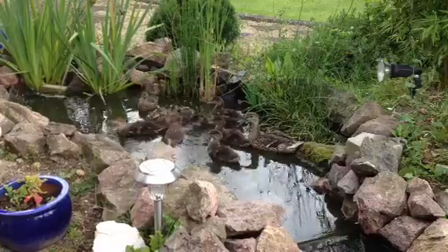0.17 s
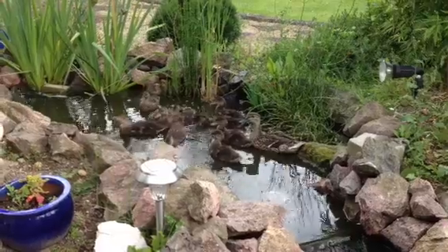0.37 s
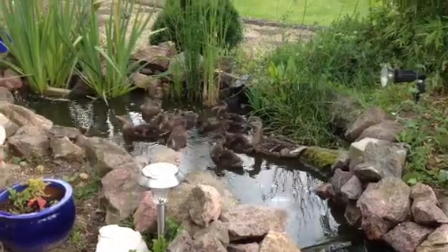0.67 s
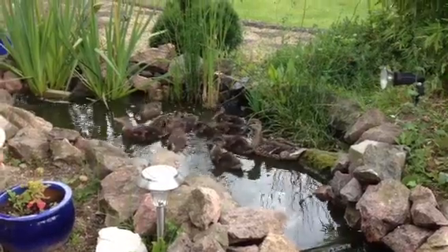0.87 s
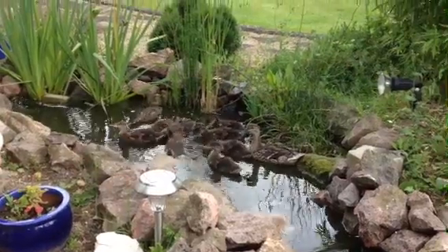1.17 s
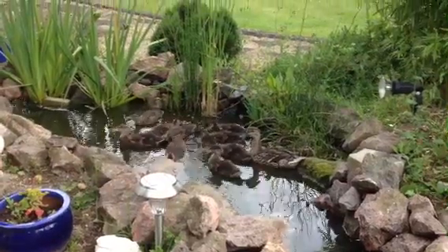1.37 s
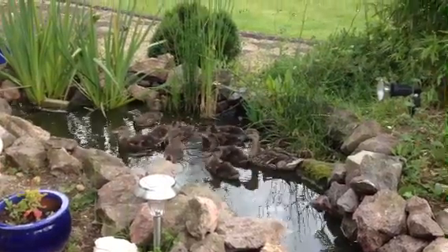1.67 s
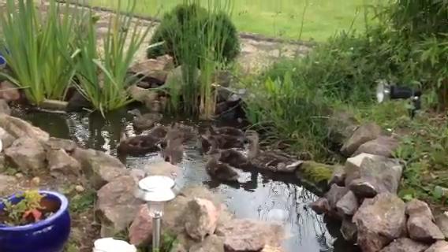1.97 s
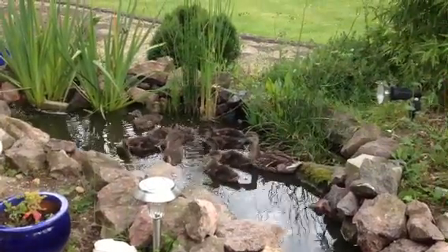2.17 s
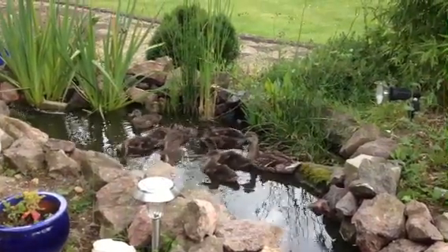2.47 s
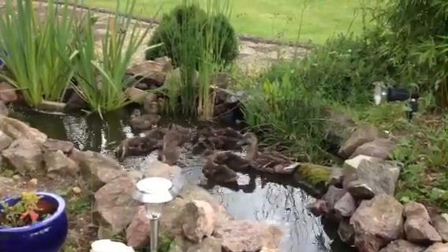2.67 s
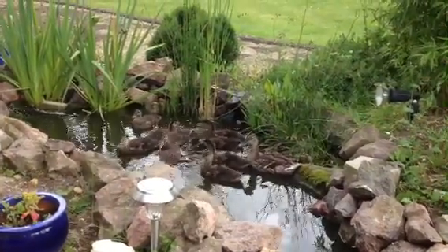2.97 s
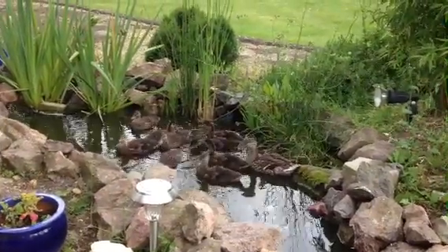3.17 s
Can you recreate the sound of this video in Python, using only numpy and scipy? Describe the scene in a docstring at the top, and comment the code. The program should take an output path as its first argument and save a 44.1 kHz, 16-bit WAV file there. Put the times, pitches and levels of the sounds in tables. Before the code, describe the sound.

Bright, bubbly trickling water in a garden pond, with ticking droplets and faint duck slaps.

```python
"""Tiny bubbles ring for a few cycles and shift in pitch as water trickles into a small stone-edged pond.
Ducks dabble a few metres from a small microphone: bills and feet slap the water, droplets tick on it.
Bubbles and slaps are decaying sines, slaps with a splash; spray, ticks and the soft wash are shaped noise.
The loudest bubbles, the ticks and the slaps are listed; chance plays the rest."""
import sys
import numpy as np
from scipy import signal
from scipy.io import wavfile
from scipy.ndimage import uniform_filter1d

SR = 44100
rng = np.random.default_rng(int(sys.argv[2]) if len(sys.argv) > 2 else 0)


def dump(signal):
    """Clip the signal to [-1, 1] and save it as 16-bit WAV at the path in sys.argv[1]."""
    limited = np.clip(np.atleast_2d(signal).T, -1, 1)
    pcm = np.round(limited * 32767).astype(np.int16)
    wavfile.write(sys.argv[1], SR, pcm)


N = 146412  # length in samples


def amp(db):
    """Decibel law: a level in dB as an amplitude ratio."""
    return 10 ** (np.asarray(db) / 20)


def evened(x):
    """Normalisation to unit root-mean-square."""
    return x / np.sqrt(np.mean(x ** 2) + 1e-20)


def add(mix, start_s, sound):
    """Linear superposition: sum a sound into the mix from its start time."""
    part = mix[round(start_s * SR):][:len(sound)]
    part += sound[:len(part)]


def train(per_s, spread_db):
    """Random point process: clicks at chance times, mostly small, a few large."""
    size = amp(spread_db * np.minimum(rng.exponential(1, N), 3.2))
    return size * (rng.random(N) < per_s / SR)


def puff(decay_ms, size):
    """Exponential decay of impulsive noise: it starts at once and dies away, one row per event."""
    t_ms = 1000 * np.arange(1500) / SR
    return rng.standard_normal((size, 1500)) * np.exp(-t_ms / decay_ms)


SWELL, FADE = 4, 1.24  # squareness of the start and end of a bubble's ring


def bubble(hz, ring_ms, rise, phase):
    """Damped resonance of a gas bubble: a gliding sine, at least half its peak for one ring length."""
    ring_s = max(ring_ms, .2) / 1000
    u = np.arange(-ring_s, 2.5 * ring_s, 1 / SR) / ring_s  # ring lengths from the middle
    shape = .5 ** (abs(2 * u) ** np.where(u < 0, SWELL, FADE))
    pitch = np.clip(hz * (1 + rise * u), 50, SR / 2.2)
    turns = np.cumsum(pitch) / SR
    return shape * np.sin(2 * np.pi * (turns + phase))


# Colour of the water as heard through the microphone.
# Each row: frequency in Hz, relative spectral density in dB per Hz.
WATER_COLOUR = [(24, -65), (40, -31), (75, -28.5), (106, -14.5), (179, -7.5), (378, -17), (474, -3.5),
                (537, -10.5), (724, -7), (820, -10), (1130, -2.5), (1490, -7.5), (1650, -5.5), (1820, -8),
                (2230, -3), (3080, -15.5), (4480, -3), (5080, -9), (5900, -4.5), (7020, -10.5), (9010, -10),
                (10200, -17), (12800, -11), (14500, -26.5), (15600, -27)]


def coloured(x):
    """Minimum-phase filtering: a causal response gives flat sound the colour of the table."""
    hz = np.abs(np.fft.fftfreq(8192, 1 / SR))
    f, db = np.transpose(WATER_COLOUR)
    log_gain = np.interp(np.log(hz + 1), np.log(f + 1), db) * np.log(10) / 20
    # the Hilbert transform of the log gain gives the phase
    response = np.exp(np.conj(signal.hilbert(log_gain)))
    taps = np.fft.ifft(response).real[:4096]
    return evened(signal.oaconvolve(x, taps)[:N])


BANK_DB, BANK_T60_S = -9.5, 0.095  # echo energy against the direct sound, decay time to -60 dB


def bank(x):
    """Diffuse reflection: short scattered echoes from the stones around the pond."""
    t = np.arange(4000) / SR
    signs = rng.choice([-1., 1.], len(t))
    sparse = (rng.random(len(t)) < .05) * (t > .002)
    taps = signs * sparse * amp(-60 * t / BANK_T60_S)
    return x + amp(BANK_DB) * signal.oaconvolve(x, taps / np.linalg.norm(taps))[:N]


PATCH_DB = 4.5  # rms depth of the patches


def wash():
    """Modulated noise: a distant trickle whose level drifts in patches of time and frequency."""
    a, b, patches = rng.standard_normal((N // 128 + 5, 257, 3)).T
    patches = uniform_filter1d(patches, size=6, axis=0)  # across frequency
    patches = evened(uniform_filter1d(patches, size=10, axis=1))  # across time
    spectrum = (a + 1j * b) * amp(PATCH_DB * patches)
    return evened(signal.istft(spectrum, nperseg=512, noverlap=384)[1][:N])


GUSH_DB, GUSH_MS = 1.8, 9.  # rms depth and smoothing time of the swells
STIR_DB, STIR_MS = 12, 4.8  # how hard and how long each loud bubble stirs up the small ones


def gush():
    """Amplitude modulation: quick swells for all small water sounds, and a burst at each loud bubble."""
    smooth = uniform_filter1d(rng.standard_normal(N), int(GUSH_MS * SR / 1000))
    swells = amp(GUSH_DB * evened(smooth))
    stir = np.zeros(N)
    fall = np.exp(-1000 * np.arange(2000) / SR / STIR_MS)
    for middle_s, db, hz, ring_ms, rise in LOUD_BUBBLES:
        add(stir, middle_s - ring_ms / 2000, amp(db / 2) * fall)  # half the bubble's dB
    return swells * (1 + amp(STIR_DB) * stir)


SPRAY_PER_S, SPRAY_SPREAD_DB, SPRAY_MS = 250, 2.5, 0.94  # rate, size spread, decay time


def spray():
    """Shot noise: each droplet is a very short puff of wide noise."""
    t_ms = 1000 * np.arange(600) / SR
    puffs = signal.oaconvolve(train(SPRAY_PER_S, SPRAY_SPREAD_DB), np.exp(-t_ms / SPRAY_MS))[:N]
    return evened(puffs * rng.standard_normal(N))


FIZZ_PER_S, FIZZ_SPREAD_DB = 6000, 5
FIZZ_CYCLES, FIZZ_RISE = 5.54, 0.17  # average ring in cycles, average share of pitch gained over it
FIZZ_SMALL = .45  # how strongly the count grows toward small, high bubbles


def fizz():
    """Superposed resonances: thousands of tiny bubbles of many sizes, more of the small ones."""
    pitches = np.geomspace(230, 14500, num=140)
    share = pitches ** FIZZ_SMALL / (pitches ** FIZZ_SMALL).sum()
    which = np.searchsorted(np.cumsum(share), rng.random(N))
    drops = train(FIZZ_PER_S, FIZZ_SPREAD_DB)
    out = np.zeros(N)
    for k, hz in enumerate(pitches):
        cycles, rise, phase = rng.random(3) * [1.2, 2, 1] + [.4, 0, 0]
        ring = bubble(hz, 1000 * FIZZ_CYCLES * cycles / hz, FIZZ_RISE * rise, phase)
        # equal power per Hz before the colour filter
        ring = ring / np.linalg.norm(ring) * np.sqrt(hz / share[k])
        out += signal.oaconvolve(drops * (which == k), ring)[:N]
    return evened(out)


TICK_HZ, TICK_HALF_WIDTH_HZ, TICK_MS = 11780, 1950, 0.56  # band centre, half width, noise decay
# Droplets that tick on the surface. Each row: start in seconds, peak level in dB.
DROPLET_TICKS = [(0.4, -39), (0.4238, -34), (0.5109, -36), (0.8916, -38), (0.951, -38), (1.1273, -36),
                 (1.3398, -35.5), (1.653, -36), (1.856, -35), (1.8986, -31.5), (2.017, -38), (2.1477, -40),
                 (2.1612, -36), (2.181, -37), (2.238, -36), (2.352, -41), (2.476, -36), (2.654, -34),
                 (2.734, -33.5), (2.8743, -30), (3.043, -36), (3.188, -36), (3.264, -39)]


def ticks():
    """Band-limited impulse: each droplet sounds as a very short, high burst of noise."""
    out = np.zeros(N)
    edges = [TICK_HZ - TICK_HALF_WIDTH_HZ, TICK_HZ + TICK_HALF_WIDTH_HZ]
    band = signal.butter(N=4, Wn=edges, btype="band", fs=SR, output="sos")
    bursts = signal.sosfilt(band, puff(TICK_MS, size=len(DROPLET_TICKS)))
    for (start_s, db), tick in zip(DROPLET_TICKS, bursts):
        add(out, start_s, amp(db) * tick / abs(tick).max())
    return out


SLAP_CYCLES = 2.64  # ring of the hollow note
SLAP_WET_DB, SLAP_WET_MS, SLAP_WET_HZ = 1.5, 29, 1800  # splash: level over the note, decay, upper edge
# Bills and feet slapping the water.
# Each row: onset in seconds, peak level of the note in dB, pitch of the hollow in Hz.
WATER_SLAPS = [(0.324, -54.5, 440), (0.567, -51.5, 440), (0.874, -48.5, 455), (0.914, -52.5, 290),
               (1.306, -49, 480), (1.593, -59, 195), (1.769, -57.5, 510), (2.031, -49.5, 454),
               (2.232, -52.5, 450), (2.334, -54, 467), (2.706, -52.5, 466), (3.058, -53.5, 484),
               (3.089, -49, 504), (3.182, -50.5, 480), (3.288, -55, 493)]


def slaps():
    """Cavity resonance: a short hollow note with a dull burst of splash."""
    out = np.zeros(N)
    band = signal.butter(N=2, Wn=[250, SLAP_WET_HZ], btype="band", fs=SR, output="sos")
    splashes = signal.sosfilt(band, puff(SLAP_WET_MS, size=len(WATER_SLAPS)))
    for (onset_s, db, hz), wet in zip(WATER_SLAPS, splashes):
        ring_ms = 1000 * SLAP_CYCLES / hz
        add(out, onset_s - ring_ms / 2000, amp(db) * bubble(hz, ring_ms, FIZZ_RISE, 0))
        add(out, onset_s, amp(db + SLAP_WET_DB) * wet / abs(wet).max())
    return out


IMPACT_DB, IMPACT_MS = -64.5, 0.41  # taps of the trapping drops: rms level together, noise decay
# The loudest bubbles. Each row: middle in seconds, peak level in dB, pitch in Hz,
# ring in ms, share of pitch gained over the ring (negative: lost).
LOUD_BUBBLES = [(0.092, -32, 6200, 1.07, -0.017), (0.1017, -46, 1510, 5.3, 0.012),
                (0.1359, -37, 4810.0, 1.8, -0.013), (0.1649, -37.5, 5850, 1.6, -0.11),
                (0.1713, -43.5, 2360, 6.9, -0.059), (0.1885, -32, 4130, 1.1, 0.2),
                (0.2039, -42, 4430.0, 1.9, 0.04), (0.2115, -33, 4780, 2.3, 0.11),
                (0.2432, -32, 5770, 1.35, 0.012), (0.2448, -35, 2100, 4, -0.05),
                (0.252, -33, 5940, 1.06, -0.023), (0.3272, -45.5, 856, 4.9, 0.059),
                (0.355, -41, 1117, 6.6, 0.12), (0.3749, -31.5, 5530, 0.76, 0.18),
                (0.504, -37.5, 6130, 1.5, -0.0012), (0.5148, -37.5, 9110.0, 0.75, 0.037),
                (0.6105, -42.5, 6330, 2, -0.076), (0.6316, -36.5, 4200, 2.8, 0.083),
                (0.634, -41, 2300.0, 5.1, -0.05), (0.6716, -42, 2420, 2.3, -0.039),
                (0.6878, -39, 4500, 2.8, 0.055), (0.726, -41, 1210, 3.4, -0.12),
                (0.753, -42, 1030, 4.8, 0.082), (0.7708, -42, 2390, 2.9, 0.17),
                (0.7984, -32, 4840, 1.46, -0.046), (0.82, -38.5, 6050, 2.6, -0.052),
                (0.8716, -33.5, 4500, 1.25, -0.00049), (0.9078, -45, 2250, 5.7, 0.2),
                (0.914, -44, 807, 6, -0.1), (0.923, -46, 1100, 5.4, 0.073), (0.936, -41, 8740, 1.2, 0.06),
                (0.9465, -36, 5900, 1.5, 0.042), (0.953, -37, 8500, 0.62, 0.07),
                (0.9537, -41, 2360, 2.0, 0.12), (0.954, -47, 1170, 4.2, 0.11),
                (0.962, -40, 1712, 4.37, -0.059), (0.9714, -42, 1660.0, 7.8, 0.026),
                (0.9834, -32, 4400, 1.3, 0.025), (0.9979, -42, 2070, 2, -0.0034),
                (1.001, -35, 4180, 1.8, 0.18), (1.043, -38, 1235, 3.1, 0.15),
                (1.0905, -42.5, 2170, 4.1, -0.027), (1.1272, -36.5, 6130, 1.4, -0.096),
                (1.1292, -38, 4650.0, 2.6, -0.028), (1.1496, -37.5, 2260, 2.3, 0.2),
                (1.1808, -38, 4100, 1.3, -0.15), (1.222, -44, 4580, 2.7, 0.032),
                (1.2258, -42, 4460, 3.7, 0.014), (1.2323, -42.6, 1104, 3.7, 0.0087),
                (1.232, -47, 1680, 10, -0.1), (1.2343, -40.5, 2220, 5.5, -0.043),
                (1.2444, -49.5, 587, 16, -0.072), (1.2532, -38, 4100, 1.2, -0.069),
                (1.3014, -42, 2510, 4.2, 0.1), (1.309, -25.5, 4400, 2.1, 0.13),
                (1.313, -43, 740, 5.5, -0.17), (1.331, -39.5, 1120, 4.3, -0.092),
                (1.35, -39.5, 1660, 3.2, -0.056), (1.3904, -31, 6260, 0.8, 0.18),
                (1.398, -34, 7300, 0.88, -0.095), (1.4, -39, 4080, 1.5, -0.00035),
                (1.421, -46, 6060.0, 0.87, 0.02), (1.427, -38, 9140, 1.16, 0.12),
                (1.5196, -32.5, 8340, 0.99, 0.092), (1.6083, -42, 2170, 2.2, -0.086),
                (1.6269, -33.5, 5940, 0.96, -0.0049), (1.6324, -48, 1680, 7.5, -0.097),
                (1.6854, -33, 4660, 1.5, -0.2), (1.6852, -31, 8500, 0.5, 0.042),
                (1.7067, -35, 6650, 0.67, 0.15), (1.7166, -44, 4170, 1.6, -0.15),
                (1.7303, -43.5, 2230, 5.5, -0.098), (1.7332, -36, 4630, 4.4, -0.16),
                (1.791, -40.5, 1730, 4, 0.16), (1.8746, -40.5, 2150, 5.8, 0.12),
                (1.939, -46, 2400, 4.5, -0.025), (1.976, -43.5, 1052, 17, 0.275),
                (1.996, -36, 6340, 1.2, 0.088), (2.017, -37, 5770, 2.7, -0.023),
                (2.0189, -36, 7440, 1.35, -0.024), (2.028, -42, 1090, 2.5, -0.13),
                (2.0296, -45, 736, 5.3, 0.03), (2.0326, -48, 2100, 4.3, -0.021),
                (2.0363, -36, 5760, 0.81, 0.16), (2.0407, -38.5, 1180, 8.8, 0.022),
                (2.0998, -34.5, 5540, 1.4, -0.0058), (2.1559, -33.5, 6200, 1.4, -0.027),
                (2.1598, -34, 8600, 0.53, 0.11), (2.2378, -40.5, 1090, 3, 0.029),
                (2.2384, -42, 803, 5.4, -0.026), (2.259, -43.5, 1090, 6.2, 0.34),
                (2.288, -47.5, 1525, 9.3, 0.0076), (2.3379, -44, 2230, 4.9, -0.11),
                (2.3501, -33, 4260, 1.2, 0.05), (2.536, -46, 1320, 3.9, -0.11),
                (2.553, -48, 1086, 8, -0.099), (2.605, -33.5, 5820, 2.45, 0.2),
                (2.614, -41, 3040, 3.8, 0.34), (2.6319, -28.5, 4930, 0.9, -0.24),
                (2.6505, -39, 6850, 3.6, 0.17), (2.664, -34, 5800, 0.99, -0.088),
                (2.697, -49, 1336, 8, -0.27), (2.711, -34, 6530, 1.4, 0.31), (2.7267, -37, 6000, 1.2, 0.17),
                (2.78, -48, 2120, 5.3, 0.22), (2.79, -33, 6460, 0.74, 0.16),
                (2.7985, -35.5, 3760, 0.99, 0.063), (2.8208, -36, 6230.0, 0.8, -0.025),
                (2.8766, -29, 5940, 1.2, -0.02), (2.88, -48, 1270, 10, -0.11),
                (2.917, -39.5, 4800, 1.6, -0.067), (2.9554, -39.5, 5730, 1.5, -0.039),
                (2.9788, -33, 5070, 1.04, -0.12), (3.0066, -40, 4700, 1.1, 0.041),
                (3.0102, -45, 2180, 4.3, 0.0035), (3.0235, -44, 1650, 2.6, 0.059),
                (3.023, -42.5, 1210, 3.5, 0.12), (3.044, -34.5, 5710, 2.8, -0.19),
                (3.0464, -33, 9300, 0.54, 0.1), (3.0586, -39, 2650, 4.2, 0.0051),
                (3.0959, -45, 930, 6.9, -0.0055), (3.186, -39, 6240.0, 1.56, 0.16),
                (3.187, -40.5, 1660, 2.5, -0.053), (3.186, -46, 944, 4.4, -0.12),
                (3.218, -38, 8900, 1.2, 0.2), (3.231, -38, 2250, 3, -0.18),
                (3.2896, -39.5, 2445, 4.5, -0.11)]


def loud_bubbles():
    """Impact and resonance: the tap of the drop that traps each bubble, and the bubble's ring."""
    rings, taps = np.zeros(N), np.zeros(N)
    count = len(LOUD_BUBBLES)
    events = zip(LOUD_BUBBLES, rng.random(count), puff(IMPACT_MS, size=count))
    for (middle_s, db, hz, ring_ms, rise), phase, tap in events:
        add(rings, middle_s - ring_ms / 1000, amp(db) * bubble(hz, ring_ms, rise, phase))
        add(taps, middle_s - ring_ms / 2000, amp(db) * tap)
    return rings + amp(IMPACT_DB) * coloured(taps)


WASH_DB, FIZZ_DB, SPRAY_DB = -9, -2, -9  # balance of the layers before swells, echoes and colour
# How busy the pond is. Each row: time in seconds, level of the chance water sounds in dB.
BUSY_LEVEL = [(0.3, -48.5), (0.52, -48.5), (0.93, -47.5), (1.53, -48), (2.19, -47.5), (2.34, -47),
              (2.6, -49), (2.82, -48.5), (3.3, -46.5)]


def scene():
    """Linear superposition: the chance water follows the busy level, the listed events keep their own."""
    time_s, db = np.transpose(BUSY_LEVEL)
    small = gush() * (amp(FIZZ_DB) * fizz() + amp(SPRAY_DB) * spray())
    water = coloured(amp(WASH_DB) * wash() + bank(small))
    level = amp(np.interp(np.arange(N) / SR, time_s, db))
    events = bank(loud_bubbles() + ticks() + slaps())
    return (level * water + events)[None]


START_S, EDGE_HZ = 0.083, 15760  # silence before the sound, upper band limit


def record(dry):
    """Gating and low-pass filtering: the sound switches on, then the band limit."""
    on = np.clip((np.arange(N) / SR - START_S) / 0.00043, 0, 1)
    low_pass = signal.firwin(511, EDGE_HZ, window=("kaiser", 9), fs=SR)
    return signal.oaconvolve(dry * on, low_pass[None], "same")


dry = scene()
out = record(dry)
dump(out)
```